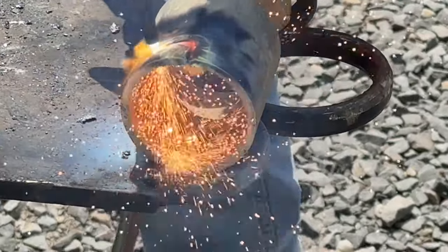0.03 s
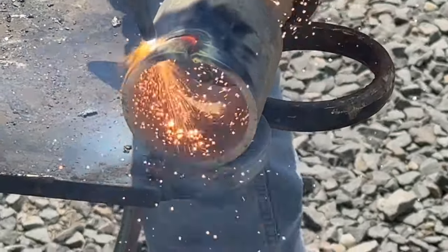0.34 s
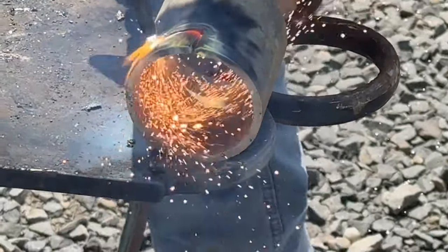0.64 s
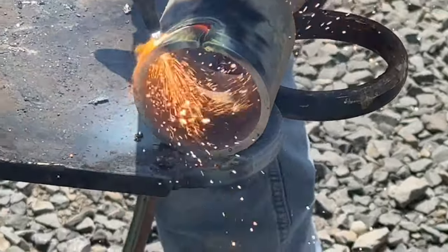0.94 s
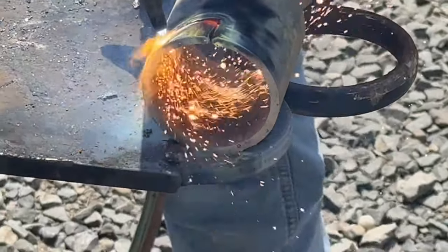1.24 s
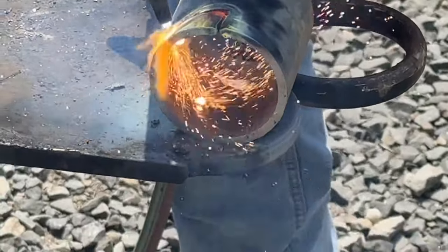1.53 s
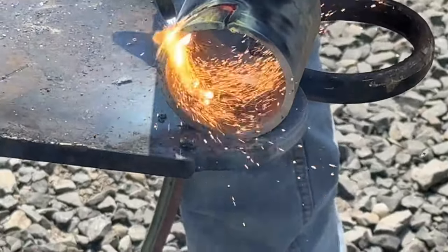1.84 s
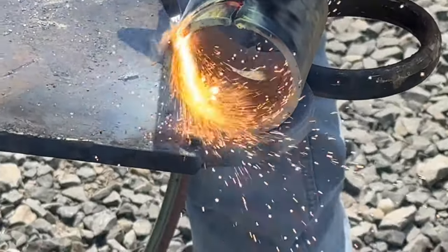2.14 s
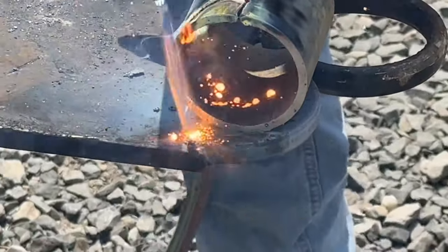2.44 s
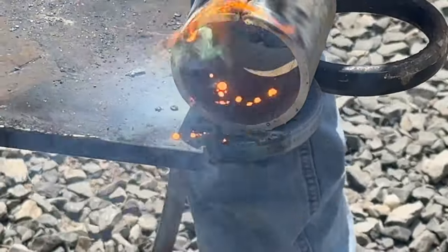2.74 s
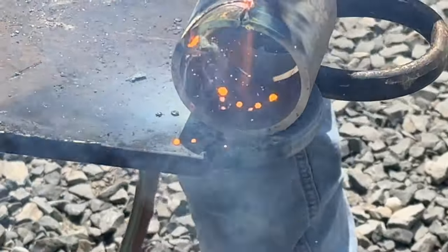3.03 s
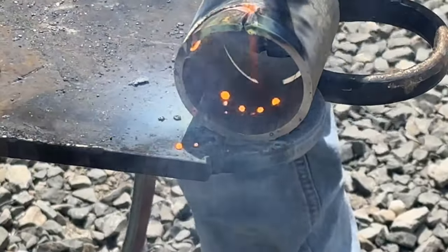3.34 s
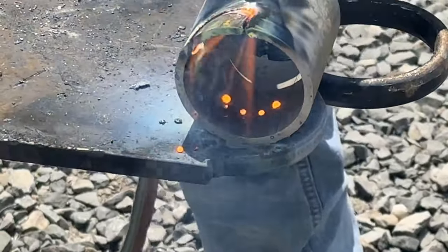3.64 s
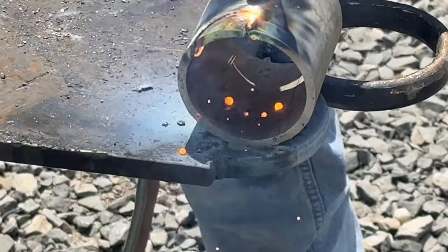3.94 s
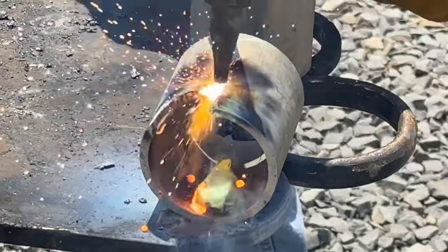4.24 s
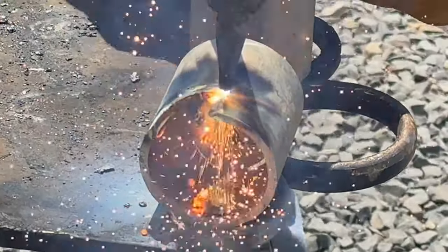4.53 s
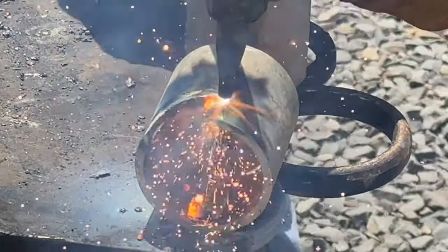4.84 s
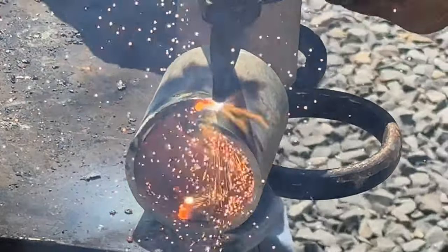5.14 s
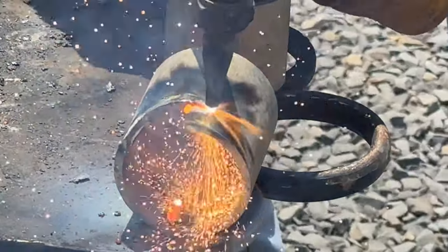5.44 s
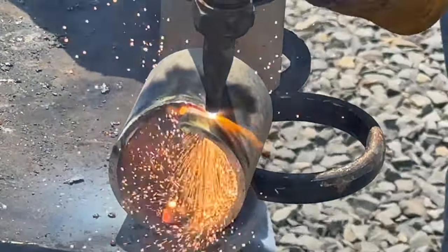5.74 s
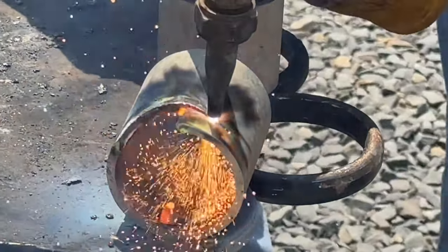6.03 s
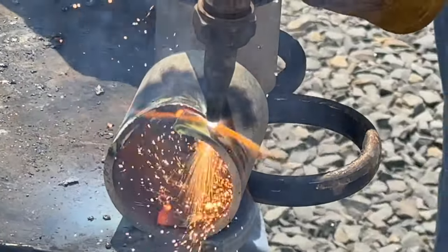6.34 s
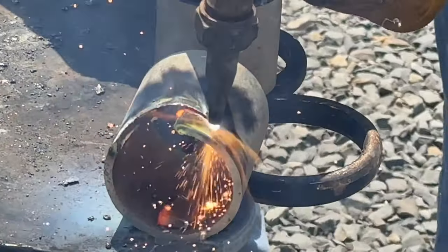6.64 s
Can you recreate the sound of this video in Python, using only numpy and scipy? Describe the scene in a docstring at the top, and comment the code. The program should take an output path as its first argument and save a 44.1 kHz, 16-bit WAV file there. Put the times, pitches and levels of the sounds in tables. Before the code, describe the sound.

A cutting torch hisses and roars through steel pipe, pauses with molten spits, restarts and gives one loud backfire pop.

```python
"""An oxy-fuel torch cuts a short steel pipe on an outdoor steel bench, close to a mono microphone.
The flame roars, and the oxygen jet hisses in the cut and makes the inside of the pipe ring.
The oxygen is shut off, molten steel spits under the flame alone, then the jet pierces again.
Slag (the molten waste) sizzles as its bubbles burst, and the yard rumbles faintly behind.
One loud backfire, a small gas explosion at the torch tip, overloads the microphone."""
import sys
import numpy as np
from scipy import signal
from scipy.fft import rfft, irfft
from scipy.io import wavfile
from scipy.ndimage import uniform_filter1d

SR = 44100
rng = np.random.default_rng(int(sys.argv[2]) if len(sys.argv) > 2 else 0)


def unload_audio(sound):
    """Save the sound as a 16-bit wav file, at the path given as the first command line argument."""
    columns = np.transpose(np.atleast_2d(sound))
    # keep every value between -1 and 1, then stretch to whole-number steps
    steps = np.round(np.clip(columns, -1, 1) * 32767)
    wavfile.write(sys.argv[1], SR, steps.astype(np.int16))


N = 298557

# Broad tone of each sound, from bass to treble: pitch_hz, level_db
YARD_TONE = [(20, -39), (55, -4), (110, 4.5), (300, 1.5), (1000, -23), (16000, -55)]
SIZZLE_TONE = [(100, -13.5), (450, 11), (1200, -6), (1800, 1.5), (3300, -5), (4300, 1.5), (8000, -2),
               (16000, -16)]
POP_TONE = [(20, -28), (70, -11), (130, -5), (230, 5.5), (310, -2), (450, 2.5), (600, 0.5), (800, 2),
            (1100, -6), (1900, -1), (3000, -7.5), (5200, -9.5), (9000, -15), (16000, -31)]
ROAR_TONE = [(20, -38), (40, -51), (70, -17.5), (120, -14.5), (190, -2), (450, 0), (700, -1), (1080, -4.5),
             (1280, -11), (2000, -25), (5000, -49), (16000, -60)]
RING_TONE = [(300, -47), (1150, -11), (1320, -12.5), (1480, 0), (2000, -1), (2250, -4), (3150, -6),
             (3700, -10), (6000, -32), (16000, -50)]
HISS_TONE = [(500, -32.5), (2500, -3.5), (3400, -6.5), (4000, 1), (5500, -0.5), (6700, -1), (8500, -6.5),
             (10500, -9), (13000, -14), (16000, -21.5)]
# Pitches that the pipe and bench boost or weaken: pitch_hz, width_hz, boost_db
PIPE_PEAKS = [(262, 58, 3), (348, 65, -3), (455, 90, 3.5), (650, 41, -1), (758, 54, 3), (902, 61, 3),
              (1086, 35, 4.5), (1160, 100, -2.5), (1630, 49, 2), (1748, 62, 4.5), (1935, 73, 5),
              (2270, 60, -8), (2255, 51, 6.5), (2450, 25, -4), (2675, 47, 2.5), (2910, 77, 2),
              (3020, 63, -6), (3360, 36, 2), (3950, 43, -1.5), (4324, 31, 5.5), (5102, 36, -0.5),
              (7680, 90, 1.5)]
# Loud spits of molten steel: start_s, peak_db, dullness (0-1)
LOUD_SPITS = [(1.896, -14, 0.64), (2.797, -25, 0), (2.889, -24, .1), (3.580, -29.5, .5),
              (3.6592, -27.5, .15), (3.737, -29, .75), (3.741, -30, .3), (3.750, -25.5, .35),
              (3.757, -28, 0.92), (3.7831, -26.5, 0.5), (3.807, -29.5, 1), (3.841, -29, .4),
              (4.3116, -9, .65)]
# Roar of the burning gas: time_s, level_db
FLAME_LEVELS = [(0, -34.5), (0.35, -32.5), (1.12, -36.5), (1.9, -32.5), (2.39, -31.5), (2.425, -40.5),
                (2.9, -41.5), (3.6, -48.5), (3.78, -47.0), (3.93, -38.5), (4.28, -35.0), (4.42, -37),
                (4.7, -33), (5.06, -33.5), (5.25, -35.5), (6.77, -35.5)]
# The flame flares and rings the pipe: peak_time_s, ring_db, rise_and_fall_s
FLAME_FLARES = [(2.36, -26, .03), (2.7, -36.5, .032), (3.921, -21.5, .012), (4.01, -15.5, 0.02),
                (4.058, -24, 0.01), (4.108, -21.5, 0.0089)]
# Strength of the oxygen jet during each cut: time_s, ring_db, hiss_db (before JET_HISS_BOOST_DB)
FIRST_JET = [(0, -34, -35.0), (0.2, -33, -33), (0.58, -34, -34), (0.95, -35, -34.5), (1.36, -30.5, -30.5),
             (1.5, -31, -33.5), (2.07, -27.0, -29.0), (2.29, -23.5, -25), (2.37, -20.5, -22.0)]
SECOND_JET = [(3.92, -34, -25.5), (3.99, -26, -24), (4.24, -31.5, -29.0), (4.42, -32.5, -33.5),
              (4.72, -26.5, -29.5), (4.9, -31.5, -29.0), (5.0, -25.5, -26.5), (5.3, -30.5, -27.5),
              (5.92, -30, -30.0), (6.05, -26, -26.5), (6.24, -30.5, -31.0), (6.77, -28.5, -28.5)]
# Ringing of each kerf, the slot the jet cuts: start_pitch_hz, drift_hz_per_s, width_hz, boost_db
FIRST_KERF = [(4950, -210, 340, 6), (4000, 170, 500, -3), (7000, 50, 600, 1.5), (8150, -40, 600, -2.5),
              (13450, -250, 750, 4.5)]
SECOND_KERF = [(5230, -35, 490, 9), (4750, -70, 570, 2.5), (7150, 0, 450, -6.5), (8600, -420, 700, 6),
               (11500, 0, 630, 7)]
# The two cuts: oxygen_on_s, oxygen_off_s, jet table, kerf table
CUTS = [(-.06, 2.381, FIRST_JET, FIRST_KERF), (3.92, 7, SECOND_JET, SECOND_KERF)]
# The torch's way round the pipe: time_s, progress (0-1)
TORCH_PATH = [(0, 0), (2.4, 0.64), (3.8, 0.5), (4.6, 0.72), (6.77, 0.98)]
# Pitches the pipe mouth shadows along that way: first_hz, last_hz, width_hz, first_db, last_db
MOUTH_SHADOWS = [(3350, 3870, 234, -7.5, -6), (2950, 2800, 420, -4, 0), (4000, 4450, 550, -6, 3.5)]
# A finer spray sounds brighter: time_s, treble_boost_db
SPRAY_BRIGHTNESS = [(0, 2.5), (.55, 3), (.85, 0.5), (2.3, -1), (2.8, 3), (3.1, -3.5), (3.85, -1.5),
                    (4.15, 0.5), (4.45, 0.5), (5.3, -1.5), (5.7, 1), (6.05, -1), (6.77, 1)]
# Gas whistles across an edge: start_s, length_s, first_hz, last_hz, width_hz, boost_db
EDGE_WHISTLES = [(-.2, .85, 9800, 10400, 1300, 5), (1.7, .45, 5870, 5660, 400, 6),
                 (2.02, 0.42, 3000, 3200, 600, 4), (2.05, .45, 4580, 4400, 340, 5),
                 (2.41, .22, 6800, 6950, 420, 8.5), (2.72, .22, 4250, 4150, 450, 4),
                 (2.75, .18, 8050, 8000, 700, 8), (3.87, .33, 3880, 3900, 380, 7),
                 (3.898, 0.037, 2500, 3700, 700, 14), (3.95, .15, 1720, 1630, 340, 10),
                 (3.97, .062, 3240, 2950, 650, 8)]
# Hollow ring of the pipe while the oxygen is off: pitch_hz, width_hz, boost_db
HOLLOW_PEAKS = [(1260, 260, -3.5), (1720, 550, 2), (2800, 800, 3), (3550, 250, -1), (4050, 380, 4),
                (8000, 1500, -2)]

PIERCE_S = 0.51  # time the jet needs to get through the wall
JET_HISS_BOOST_DB = .4
TIME = np.arange(N) / SR
FRAME = 2048  # samples in one short slice of sound; a changing tone is set slice by slice
HZ = np.arange(FRAME // 2 + 1)[:, None] * SR / FRAME
FRAME_S = np.arange(0, N + FRAME // 4, FRAME // 4) / SR


def undb(db):
    """Turn decibels into a gain, the number a sound is multiplied by."""
    return 10 ** (np.asarray(db) / 20)


def unit(x):
    """Scale a signal to an average (rms) level of 1."""
    return x / np.sqrt(np.mean(x ** 2))


def curves(table, times=TIME):
    """Join the values in each column of a table by straight lines in time."""
    time_s, *columns = np.transpose(table)
    return [np.interp(times, time_s, column) for column in columns]


def bell(hz, centre, width):
    """A hump of height 1 with the given width at half height."""
    return .5 ** ((2 * (hz - centre) / width) ** 2)


def ramp(s, length_s):
    """A straight fade from 0 to 1, half way at s = 0."""
    return np.clip(.5 + s / length_s, 0, 1)


def held(start, end, rise_s, fall_s):
    """A gain that rises smoothly to 1 by the start, holds, and falls after the end."""
    early, late = np.maximum(start - TIME, 0), np.maximum(TIME - end, 0)
    return np.exp(-(early / rise_s) ** 2 - (late / fall_s) ** 2)


def wander(per_s):
    """A smooth random wobble with a typical size of 1."""
    step = max(int(SR / per_s), 1)
    steps = np.repeat(rng.standard_normal(N // step + 1), step)
    return unit(uniform_filter1d(steps, step)[:N])


def tone_db(tone, hz=HZ):
    """The level at each pitch: a broad tone plus the peaks and dips of pipe and bench."""
    pitch_hz, level_db = np.transpose(tone)
    broad = np.interp(np.log(hz + 1), np.log(pitch_hz), level_db)
    return broad + sum(boost * bell(hz, centre, width) for centre, width, boost in PIPE_PEAKS)


def apply_tone(x, tone):
    """Filter a sound so that every click in it rings with the given tone."""
    cepstrum = irfft(np.log(undb(tone_db(tone, HZ[:, 0]))))
    # folding this onto its first half puts the ringing after each click, never before
    cepstrum[1:FRAME // 2] *= 2
    cepstrum[FRAME // 2 + 1:] = 0
    response = unit(irfft(np.exp(rfft(cepstrum)))) / np.sqrt(FRAME)
    return signal.fftconvolve(x, response)[:len(x)]


def yard(level_db=-54):
    """The faint, steady rumble of the yard."""
    return undb(level_db) * unit(apply_tone(rng.standard_normal(N), YARD_TONE))


def oxygen_flow(on_s, off_s):
    """The flow (0-1) during one cut; the valve takes a moment to open and shut."""
    return held(on_s, off_s, rise_s=.032, fall_s=.026)


def fizz():
    """The swell (0-1) of one short fizz on the molten edge."""
    return held(start=2.772, end=2.89, rise_s=.024, fall_s=.024)


def slag_gain(idle_db=-54.5, fizz_db=-49, cutting_db=-38.8, fade_db_per_s=3.1, sputter_db=1.7):
    """Slag fries unevenly: it builds as the jet gets through, then eases until the oxygen shuts."""
    gain = np.hypot(undb(idle_db), fizz() * undb(fizz_db))  # hypot adds the power of two noises
    for on_s, off_s, _, _ in CUTS:
        through_s = TIME - on_s - PIERCE_S
        cutting = ramp(through_s, 2 * PIERCE_S) * oxygen_flow(on_s, off_s)
        gain = np.hypot(gain, cutting * undb(cutting_db - fade_db_per_s * through_s))
    return gain * undb(sputter_db * wander(12))


def slag_sizzle(per_s=900, spread_db=3.5):
    """Tiny slag bubbles burst at random, many weak and a few strong."""
    chance, size, sign = rng.random(N), rng.exponential(size=N), rng.choice([-1, 1], N)
    clicks = (chance < per_s / SR) * sign * undb(spread_db * np.minimum(size, 4.5))
    return unit(apply_tone(clicks, SIZZLE_TONE)) * slag_gain()


def weak_spits(count=6, hot_at_s=3.8, build_s=.22, peak_db=-34.5, spread_db=5):
    """Rows like LOUD_SPITS, at random times that crowd together as the steel nears burning heat."""
    rows = []
    for k, (when, size, dullness) in enumerate(rng.random((count, 3))):
        start_s = hot_at_s + build_s * np.log((k + when) / count + .01)
        rows.append((start_s, peak_db + spread_db * (2 * size - 1), dullness ** .5))
    return rows


def steel_spits(splash_s=0.0008):
    """Molten droplets burst with a snap and a short splash; slower bursts sound duller."""
    out, t = np.zeros(N), TIME[:FRAME]
    for start_s, peak_db, dullness in LOUD_SPITS + weak_spits():
        burst = (t == 0) + rng.standard_normal(FRAME) * np.exp(-t / splash_s)
        dulled = signal.lfilter([1], [1, -np.clip(dullness, 0, .97)], burst)
        snap = apply_tone(dulled, SIZZLE_TONE)
        out[int(start_s * SR):][:FRAME] += undb(peak_db) * snap / np.abs(snap).max()
    return out


def backfire(start_s=4.9978, gain_db=-0.5, push_s=0.00044, rattle_s=0.0051, echo_s=0.022, tail_s=0.05):
    """Gas explodes at the tip: a push and a pull of air, a rattle in the pipe, an echo, a faint tail."""
    t = np.maximum(TIME - start_s, 0)
    blast = undb(8) * np.sin(np.pi * np.sqrt(np.minimum(t / push_s, 4)))
    # so small a source gives off little deep bass
    blast = signal.sosfilt(signal.butter(1, 125, "high", fs=SR, output="sos"), blast)
    rattle = (t > 0) * np.exp(-t / rattle_s) * (1 - np.exp(-t / 0.00085)) * undb(7.5)
    echo = np.exp(-np.abs(t - echo_s) / 0.00099) * undb(-15)
    tail = (t > 0) * np.exp(-t / tail_s) * undb(-27)
    noise = rng.standard_normal(N) * (rattle + echo + tail)
    return undb(gain_db) * (blast + apply_tone(noise, POP_TONE))


def reflections_db(count=12, depth_db=0.85):
    """Short echoes off bench and pipe wall ripple the tone; it swirls slowly as the hand moves."""
    delays_s, drifts = rng.uniform(.0007, .01, count), 8e-5 * rng.standard_normal(count)
    return sum(depth_db * np.cos(2 * np.pi * HZ * (delay_s + drift * FRAME_S))
               for delay_s, drift in zip(delays_s, drifts))


def shadows_db():
    """The pipe mouth shadows some pitches; the dips slide and change as the torch travels round."""
    progress, = curves(TORCH_PATH, FRAME_S)
    out = 0
    for first_hz, last_hz, width_hz, first_db, last_db in MOUTH_SHADOWS:
        pitch_hz = first_hz + progress * (last_hz - first_hz)
        out += (first_db + progress * (last_db - first_db)) * bell(HZ, pitch_hz, width_hz)
    return out


def hollow_db():
    """The open pipe rings hollow between the two cuts."""
    off_s, on_again_s = CUTS[0][1], CUTS[1][0]
    paused = ramp(np.minimum(FRAME_S - off_s, on_again_s - FRAME_S), .08)
    return paused * sum(boost * bell(HZ, centre, width) for centre, width, boost in HOLLOW_PEAKS)


def whistles_db():
    """Gas whistles across an edge: each whistle fades in, slides in pitch and fades out."""
    out = 0
    for start_s, length_s, first_hz, last_hz, width_hz, boost_db in EDGE_WHISTLES:
        age_s = FRAME_S - start_s
        fade = ramp(np.minimum(age_s, length_s - age_s), length_s / 2)
        pitch_hz = np.interp(age_s, [0, length_s], [first_hz, last_hz])
        out += boost_db * fade * bell(HZ, pitch_hz, width_hz)
    return out


def kerf_db(grow_s=0.24, life_at_10khz_s=1.78, fade_s=0.42):
    """The slot rings once the jet is through; as it widens, its pitches drift and die, highest first."""
    out = 0
    for on_s, off_s, _, peaks in CUTS:
        age_s = FRAME_S - on_s
        formed = ramp(age_s - PIERCE_S, grow_s) * (FRAME_S < off_s + .05)
        for pitch_hz, drift_hz_per_s, width_hz, boost_db in peaks:
            alive = ramp(life_at_10khz_s * 10000 / pitch_hz - age_s, fade_s)
            out += boost_db * formed * alive * bell(HZ, pitch_hz + drift_hz_per_s * age_s, width_hz)
    return out


def rushing_gas(shape_db, flutter_db, grain_db=1.0):
    """Swirling gas makes a fluttering, grainy noise; shape_db sets its tone, not its overall level."""
    swirls = unit(rng.standard_normal(N) * undb(flutter_db * wander(45) + grain_db * wander(600)))
    slicing = dict(nperseg=FRAME, noverlap=FRAME - FRAME // 4)
    slices = signal.stft(swirls, **slicing)[2]
    gain = undb(shape_db)
    gain /= np.sqrt(np.mean(gain ** 2, axis=0))
    return signal.istft(slices * gain, **slicing)[1][:N]


def torch_gains(ring_vs_roar_db=-4.6, hiss_vs_roar_db=-8, fizz_db=-45, flare_roar_db=-36.5):
    """Strength of roar, ring and hiss: the flame always burns; fizz, oxygen and flares add to it."""
    roar = undb(curves(FLAME_LEVELS)[0])
    ring = roar * undb(ring_vs_roar_db)
    hiss = np.hypot(roar * undb(hiss_vs_roar_db), fizz() * undb(fizz_db))
    for on_s, off_s, jet, _ in CUTS:
        flow = oxygen_flow(on_s, off_s)
        ring_db, hiss_db = curves(jet)
        ring = np.hypot(ring, flow * undb(ring_db))
        hiss = np.hypot(hiss, flow * undb(hiss_db + JET_HISS_BOOST_DB))
    for peak_time_s, ring_db, rise_and_fall_s in FLAME_FLARES:
        flare = np.exp(-np.abs(TIME - peak_time_s) / rise_and_fall_s)
        roar = np.hypot(roar, flare * undb(flare_roar_db))
        ring = np.hypot(ring, flare * undb(ring_db))
    return roar, ring, hiss


def torch():
    """The flame roars, the jet rings the pipe and hisses in the slot; slag makes all three sputter."""
    roar_gain, ring_gain, hiss_gain = torch_gains()
    peaks_db = kerf_db() + shadows_db() + hollow_db() + whistles_db()
    ripple_db = reflections_db()
    spray_db = curves(SPRAY_BRIGHTNESS, FRAME_S)[0] * np.clip((HZ - 7000) / 3000, 0, 1)
    roar = roar_gain * rushing_gas(tone_db(ROAR_TONE) + hollow_db(), flutter_db=0.5)
    ring = ring_gain * rushing_gas(tone_db(RING_TONE) + peaks_db + ripple_db / 2, flutter_db=0.46)
    hiss = hiss_gain * rushing_gas(tone_db(HISS_TONE) + peaks_db + spray_db + ripple_db, flutter_db=0.43)
    sputter = undb(.5 * wander(30) + 0.29 * wander(200))
    return (roar + ring + hiss) * sputter


def scene():
    """All the sounds added up, the same in both channels."""
    return np.tile(torch() + slag_sizzle() + steel_spits() + backfire() + yard(), (2, 1))


def record(dry, limit=.93, top_hz=15800):
    """The microphone flattens peaks that are too loud, and the highest treble is cut."""
    treble_cut = signal.ellip(10, .1, 85, top_hz, fs=SR, output="sos")
    return signal.sosfilt(treble_cut, np.clip(dry, -limit, limit))


dry = scene()
out = record(dry)
unload_audio(out)
```